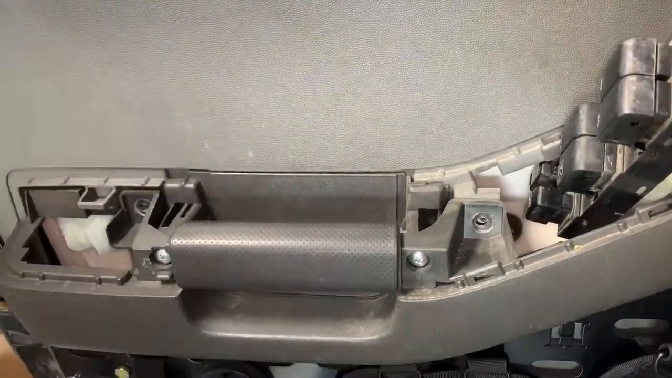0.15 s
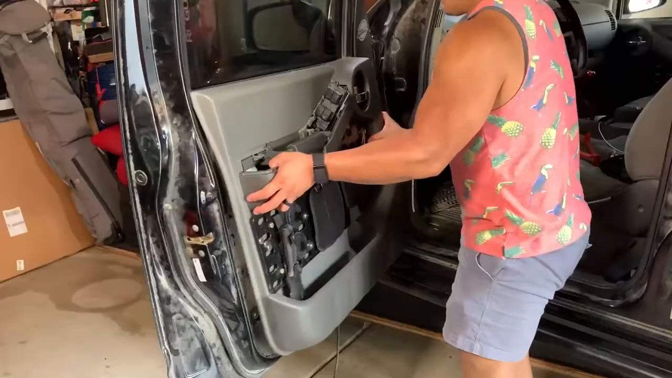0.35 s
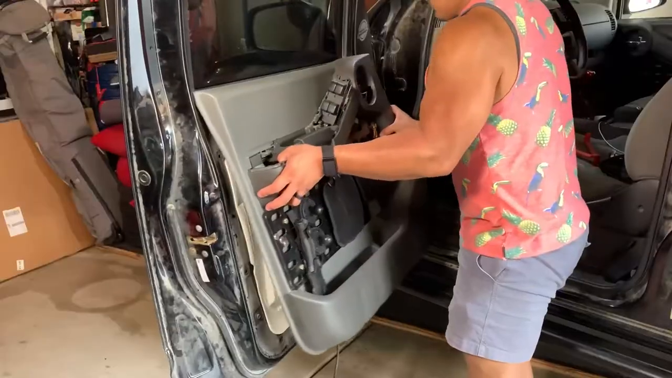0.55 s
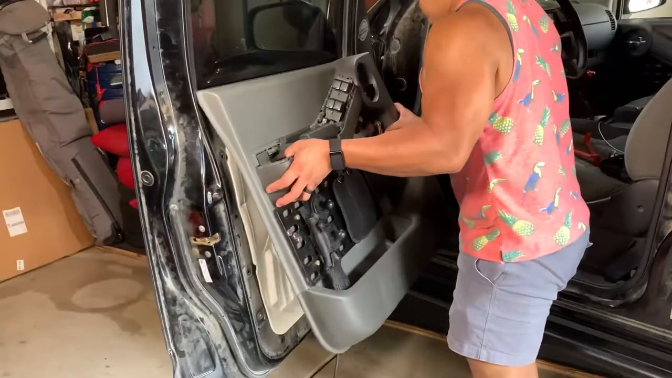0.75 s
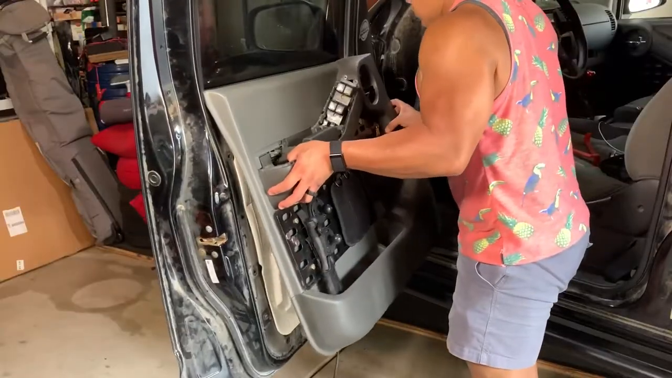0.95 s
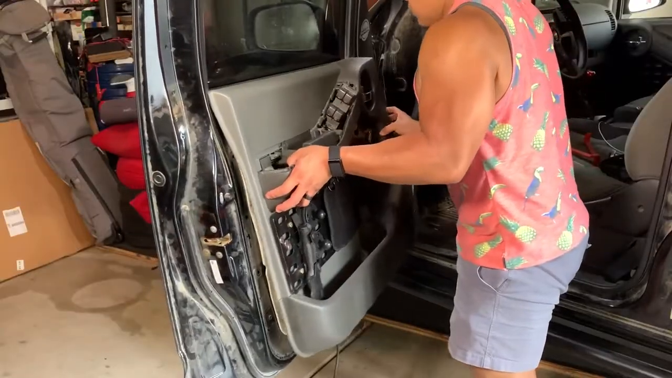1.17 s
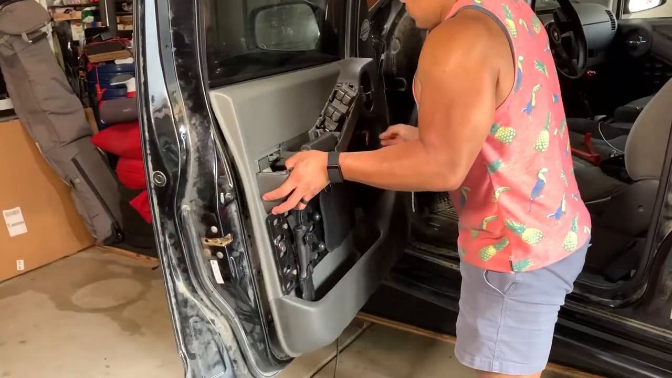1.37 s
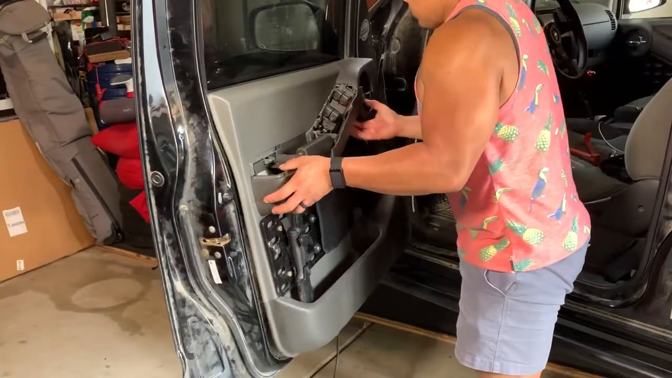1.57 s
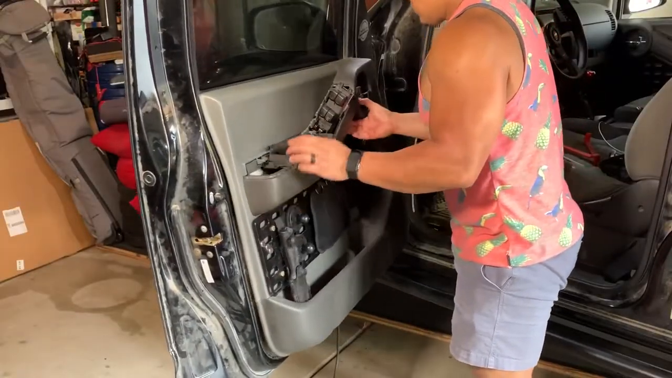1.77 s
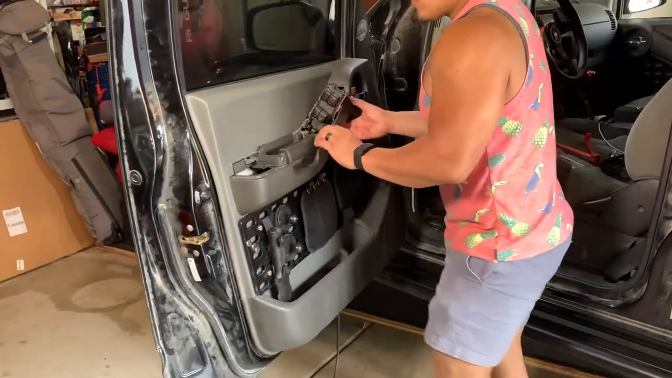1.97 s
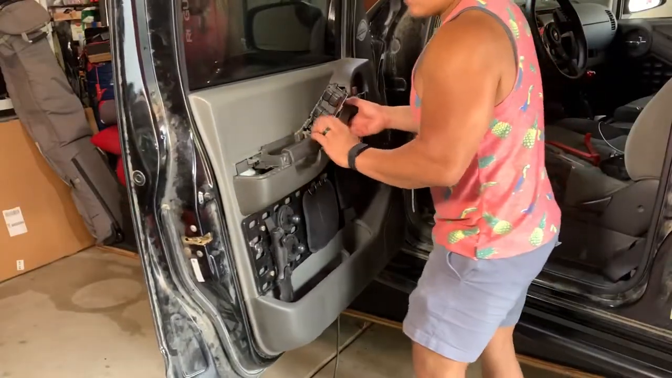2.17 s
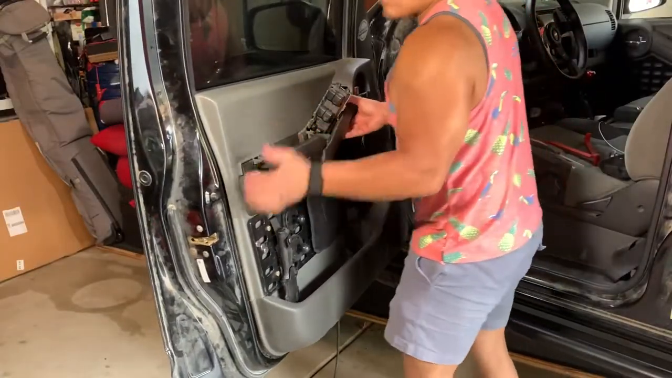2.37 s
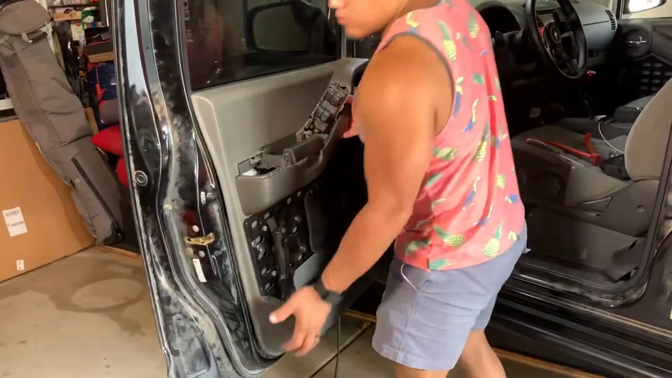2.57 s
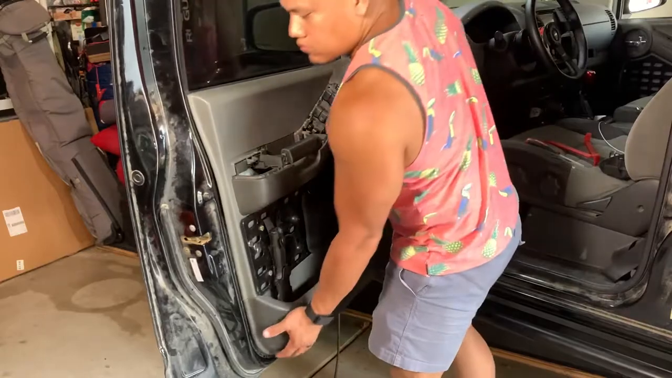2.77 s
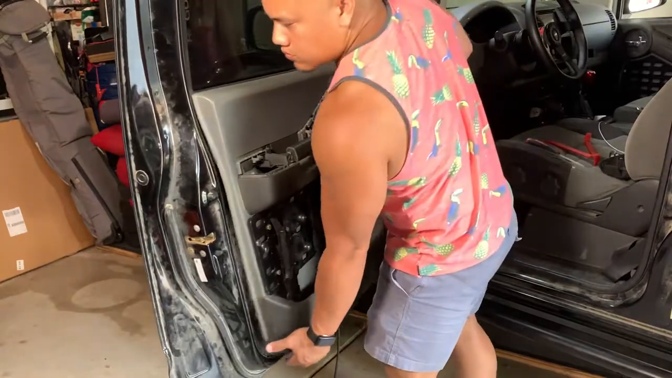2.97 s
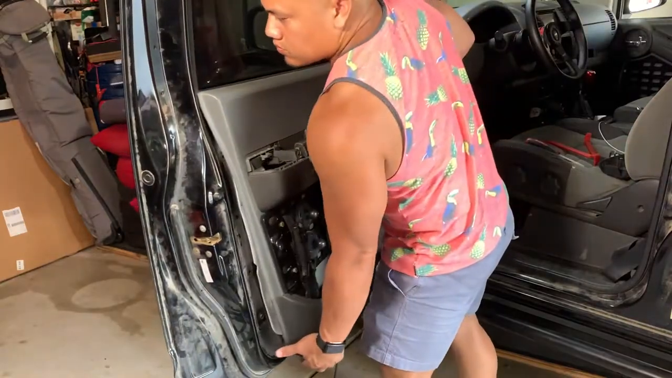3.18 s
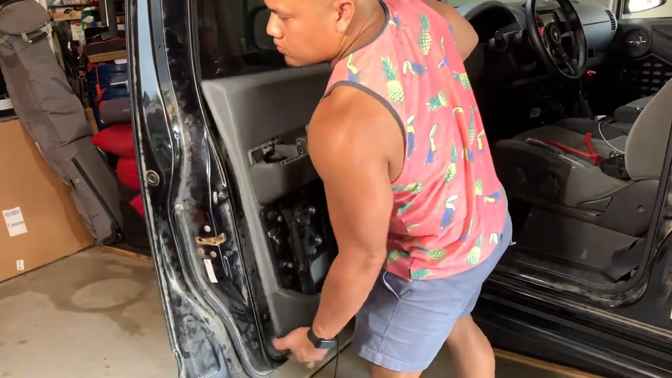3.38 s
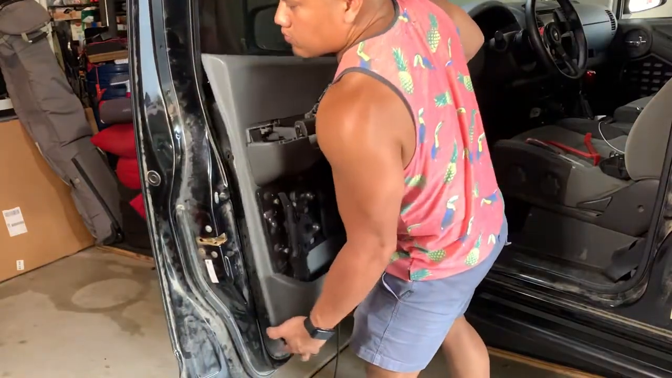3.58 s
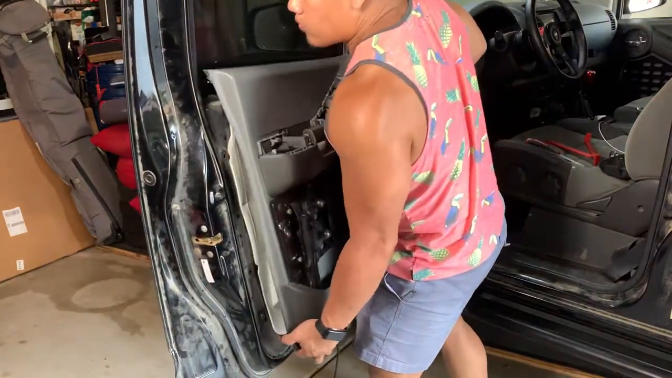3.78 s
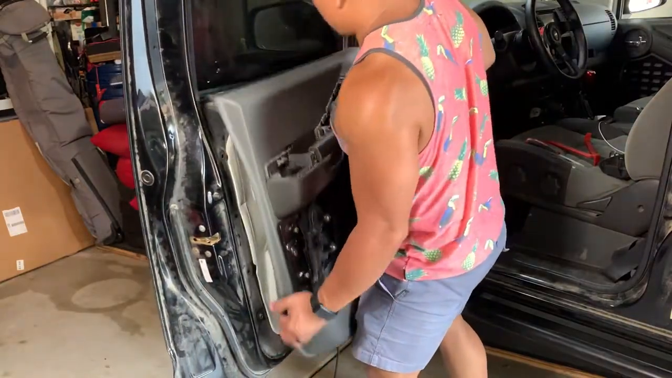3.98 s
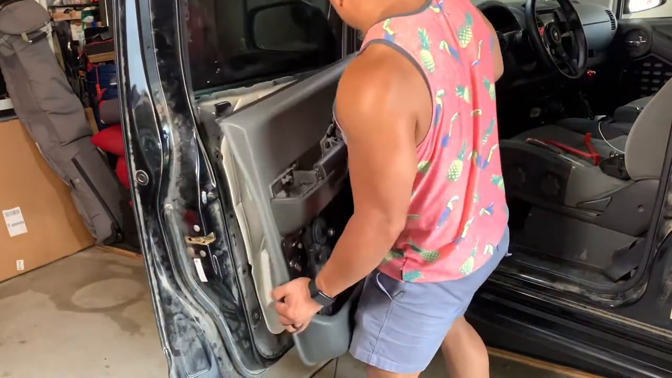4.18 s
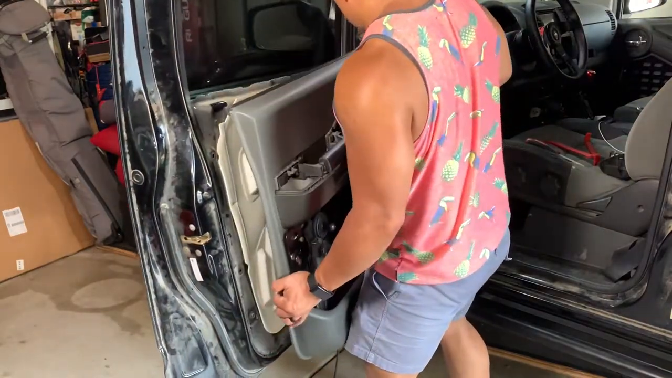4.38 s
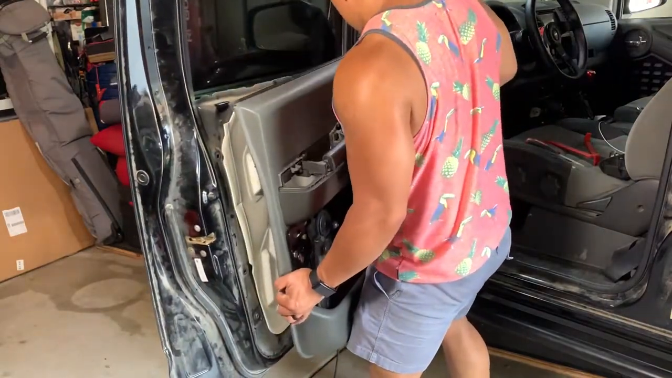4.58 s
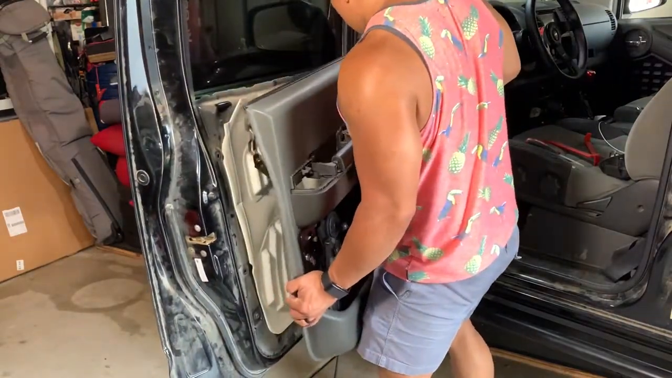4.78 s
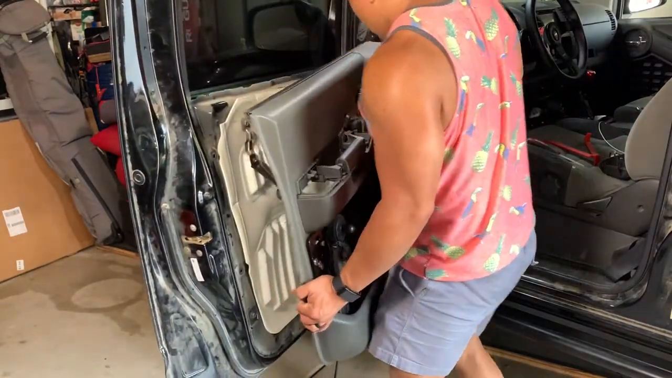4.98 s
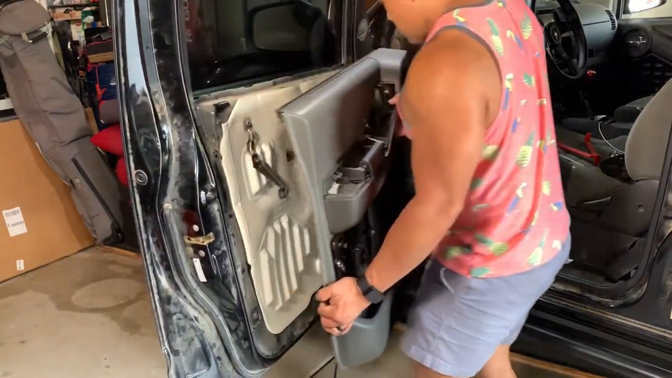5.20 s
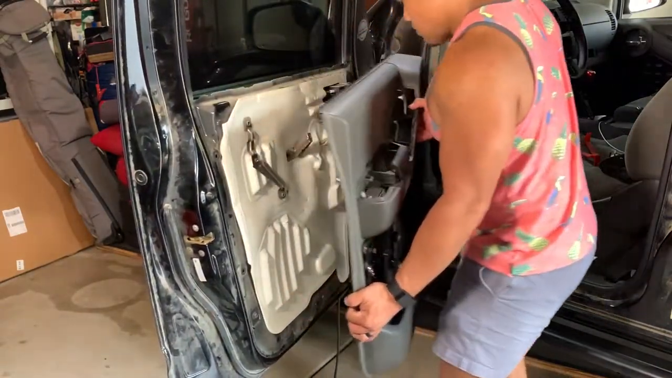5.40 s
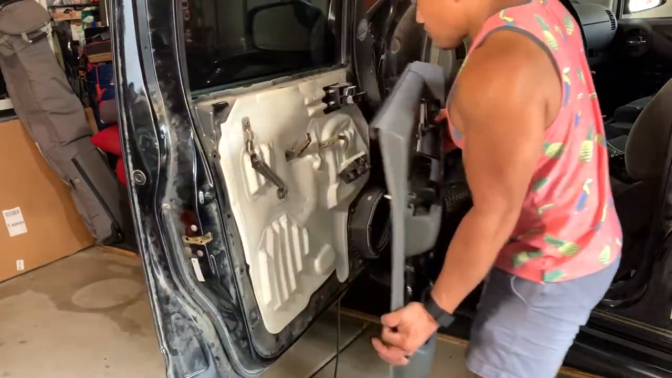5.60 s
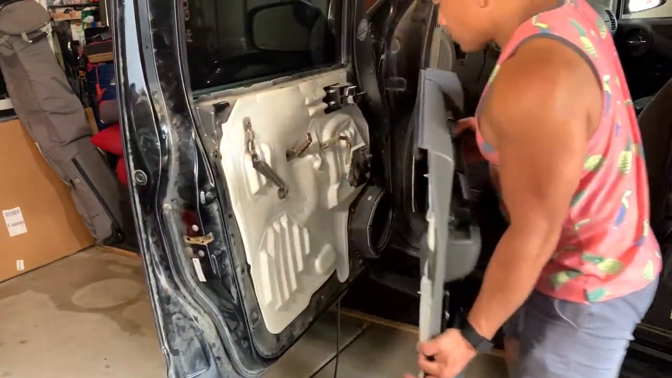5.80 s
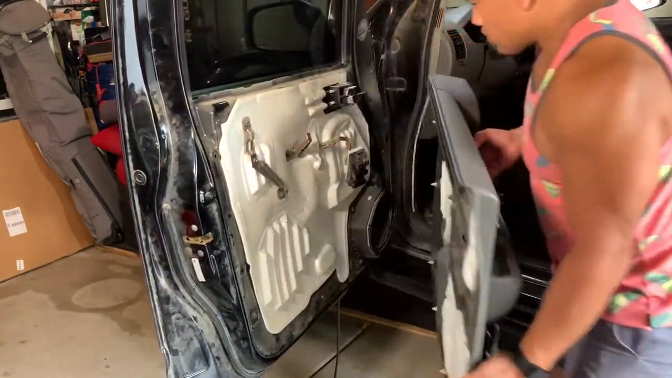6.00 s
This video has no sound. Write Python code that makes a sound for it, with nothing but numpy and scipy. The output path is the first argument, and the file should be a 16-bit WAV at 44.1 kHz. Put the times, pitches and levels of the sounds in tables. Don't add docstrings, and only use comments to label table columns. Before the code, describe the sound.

After a tiny silence, a plastic car door panel is tugged close to the microphone: a knock with crackle, soft bumps and rubbing, then sharp snaps around one and a half seconds. A quieter stretch holds light rubbing and faint squeaks. Near three and a half seconds come a chirp, booming thuds and the loudest crack, followed by scattered clicks and knocks that thin into faint rustles. Short garage echoes, low air hum.

```python
import sys
import numpy as np
from scipy import signal
from scipy.fft import rfft, irfft
from scipy.io import wavfile
from scipy.ndimage import uniform_filter1d

SR = 44100
rng = np.random.default_rng(int(sys.argv[2]) if len(sys.argv) > 2 else 0)


def voltage_ratio(level):
    return 10 ** (np.asarray(level, float) / 20)


def to_wav(sig):
    pcm = np.clip(np.atleast_2d(sig), -1, 1) * 32767
    pcm = np.round(pcm).astype(np.int16)
    wavfile.write(sys.argv[1], SR, pcm.T)


N = 266760

# frequency in Hz, level in dB.
HISS_COLOUR = [(2800, -5), (4500, -0.6), (7000, -1.5), (10000, -2), (12000, -10.5), (15500, -5),
               (16300, -26.5)]


def evened(x):
    return x / np.sqrt(np.mean(x ** 2) + 1e-20)


def read(points, hz):
    f, value = np.transpose(points)
    return np.interp(np.log(hz + 1), np.log(f + 1), value)


def add(mix, s, sound):
    part = mix[round(s * SR):][:len(sound)]
    part += sound[:len(part)]


def colour(x, points):
    hz = np.fft.rfftfreq(x.shape[-1], 1 / SR)
    return evened(irfft(rfft(x) * voltage_ratio(read(points, hz)), x.shape[-1]))


def resonances(x, modes):
    out = 0
    for k, (hz, width, db) in enumerate(modes):
        b, a = signal.iirpeak(hz, hz / width, SR)
        ringing = signal.lfilter(b, a, signal.lfilter(b, a, x))
        out = out + (-1) ** k * voltage_ratio(db) * evened(ringing)
    return evened(out)


def surge(t, s, rise_s, fall_s):
    return voltage_ratio(-20 * np.maximum((s - t) / rise_s, (t - s) / fall_s))


def air():
    # frequency in Hz, density in dB per Hz.
    hum_colour = [(30, 13), (60, -6), (120, -11.5), (250, -18), (600, -25.5), (1500, -31), (3000, -50),
                  (6000, -53.5), (16000, -61)]
    same, left, right = rng.standard_normal((3, N))
    bass = signal.lfilter(*signal.butter(1, 900, fs=SR), same)
    pair = np.array([left, right]) + 0.73 * bass
    tilt = [(hz, db - 10 * np.log10(1 + 5.6 / (1 + (hz / 900) ** 2))) for hz, db in hum_colour]
    return voltage_ratio(-41.5) * colour(pair, tilt)


def echoes():
    # frequency in Hz, t60 in seconds.
    decay = [(100, 0.24), (400, 0.28), (1500, 0.34), (4000, 0.24), (9000, 0.24), (15000, 0.24)]
    # frequency in Hz, level in dB.
    echo_colour = [(100, -4), (350, -3.5), (1000, -1.5), (3000, -0.5), (9000, -1.5), (15000, -12.5)]
    taps = np.zeros((2, SR // 2))
    at = np.arange(120, SR // 2 - 20, 20) + rng.integers(0, 20, (2, (SR // 2 - 121) // 20))
    np.put_along_axis(taps, at, rng.choice([-1., 1.], at.shape), 1)
    hz, t, z = signal.stft(taps, SR, nperseg=256)
    shared = .93 / (1 + (hz[:, None] / 560) ** 2)
    z = np.array([z[0], shared * z[0] + np.sqrt(1 - shared ** 2) * z[1]])
    fading = voltage_ratio(-60 * t / read(decay, hz)[:, None])
    tail = signal.istft(z * fading, SR, nperseg=256)[1]
    tail = tail / np.linalg.norm(tail[0])
    hz = np.fft.rfftfreq(tail.shape[1], 1 / SR)
    return irfft(rfft(tail) * voltage_ratio(read(echo_colour, hz)), tail.shape[1])


def garage(x):
    turn = 2 * np.pi * np.arange(N) / SR / .05
    first = signal.fftconvolve((x * np.cos(turn))[None], echoes(), axes=1)
    second = signal.fftconvolve((x * np.sin(turn))[None], echoes(), axes=1)
    return first[:, :N] + second[:, :N]


def door_boom():
    # frequency in Hz, width in Hz, level in dB.
    skin_modes = [(56.6, 39, -4.5), (93.6, 27.6, -2), (134.4, 54, -2.5)]
    # peak time in seconds, boom in dB, release in seconds per 20 dB.
    pushes = [(.25, -39, 0.12), (.45, -41, .1), (.6, -42.5, 0.21), (.89, -39.5, 0.11), (1.33, -42.5, 0.067),
              (1.52, -41.5, 0.19), (1.67, -37, .15), (2.13, -45.5, 0.089), (2.78, -49, .08),
              (2.909, -48.5, 0.13), (3.43, -36, .08), (3.51, -21.5, 0.033), (3.59, -34.5, 0.084),
              (3.87, -29.5, 0.08), (4.03, -27, 0.17), (4.34, -39, 0.084), (4.65, -43, .1), (4.8, -44, .15),
              (6.04, -57, .1)]
    t = np.arange(0, N + 64, 64) / SR
    boom = voltage_ratio(-52.5)
    for s, db, fall_s in pushes:
        boom = boom + voltage_ratio(db) * surge(t, s, 0.064, fall_s)
    boom = np.interp(np.arange(N) / SR, t, boom)
    return voltage_ratio(-0.5) * boom * resonances(rng.standard_normal(N), skin_modes)


def slips(per_s, spread_db, smooth):
    size = voltage_ratio(spread_db * np.minimum(rng.exponential(1, N), 4)) * rng.choice([-1., 1.], N)
    clicks = size * (rng.random(N) < per_s / SR)
    return evened(clicks) + smooth * rng.standard_normal(N)


def rubbing():
    # frequency in Hz, width in Hz, level in dB.
    body_modes = [(242, 110, 3), (310, 83, 6.5), (496.3, 39, 1), (620, 300, -2.5), (917, 160, -4)]
    # frequency in Hz, level in dB.
    scrape_colour = [(800, -18), (1400, -9), (2000, -1), (2800, -6.5), (4000, -7), (5500, -17),
                     (7000, -23.5)]
    # time in seconds, effort in dB.
    grip = [(0.21, -46), (0.4, -47.5), (0.8, -60.5), (1.2, -51), (1.43, -81), (1.6, -45), (1.9, -58),
            (2.4, -70), (2.7, -71), (2.9, -59.5), (3.3, -62.5), (3.7, -55), (4.2, -47), (4.5, -62.5),
            (4.9, -43), (5.14, -66.5), (5.6, -65), (6.05, -64.5)]
    # peak time in seconds, shudder, scrape and hiss in dB.
    jolts = [(.385, -44, -69, -76), (.78, -45, -60, -84), (.89, -47.5, -69, -82), (1.17, -49.5, -71, -67),
             (1.329, -45.5, -65, -86), (1.487, -33.5, -37.5, -61.5), (1.639, -34, -60, -46),
             (1.98, -56, -78, -90), (2.861, -47, -76, -65), (3.511, -29.5, -43, -75),
             (3.661, -38, -71, -72), (3.832, -38, -29.5, -65), (3.921, -29, -56, -47),
             (4.027, -16.5, -39, -51.5), (4.21, -37.5, -53, -61.5), (4.65, -41.5, -53, -70),
             (4.93, -47, -64, -53), (5.18, -39.5, -58, -77), (5.949, -55, -67, -79), (4.87, -38, -61, -70),
             (3.6, -41, -59, -76), (3.7, -50, -70, -78), (1.72, -47, -66, -75), (1.81, -47, -62, -75)]
    # start, end and rise in seconds, scrape and hiss in dB.
    strokes = [(0.786, 0.938, 0.053, -56, -45.5), (2.134, 2.332, 0.02, -47.5, -46.5),
               (2.7, 2.97, 0.035, -61, -58.5), (3.35, 3.54, 0.055, -43, -51.5),
               (4.92, 5.014, 0.021, -64, -49), (5.247, 5.53, 0.025, -62, -56.5),
               (5.63, 5.82, 0.077, -63.5, -56.5), (5.91, 6.0, 0.0077, -61, -57.5),
               (1.236, 1.308, .008, -55, -80), (1.99, 2.071, 0.014, -58.5, -66),
               (3.802, 3.86, 0.028, -34.5, -57.5), (0.41, 0.478, .0074, -53, -68),
               (4.22, 4.32, 0.031, -58, -44), (.212, 0.28, .004, -54, -56), (1.546, 1.622, 0.029, -48, -41),
               (5.5, 5.67, 0.027, -70, -74), (5.78, 5.92, .02, -78, -73), (3.22, 3.35, .02, -67, -69.5),
               (5.96, 6.08, 0.024, -71, -66.5), (1.142, 1.28, .04, -67.5, -68.5),
               (1.34, 1.43, .01, -65.5, -69.5), (5.82, 5.9, .008, -67, -67), (5.11, 5.2, 0.044, -53, -62),
               (3.0, 3.14, 0.032, -70.5, -74), (3.84, 3.99, .01, -41.5, -57.5),
               (1.6, 1.696, 0.0088, -49, -53), (4.82, 4.97, .01, -60, -53)]
    t = np.arange(0, N + 64, 64) / SR
    shudder = voltage_ratio(np.interp(t, *np.transpose(grip)))
    scrape, hiss = voltage_ratio(-12.5) * shudder, voltage_ratio(-28) * shudder
    for s, shudder_db, scrape_db, hiss_db in jolts:
        jolt = surge(t, s, 0.024, 0.048)
        shudder = shudder + voltage_ratio(shudder_db) * jolt
        scrape = scrape + voltage_ratio(scrape_db) * jolt
        hiss = hiss + voltage_ratio(hiss_db) * jolt
    for start, end, rise_s, scrape_db, hiss_db in strokes:
        stroke = np.clip(np.minimum((t - start) / rise_s, (end - t) / 0.045), 0, 1) ** 6.7
        scrape = scrape + voltage_ratio(scrape_db) * stroke
        hiss = hiss + voltage_ratio(hiss_db) * stroke
    shudder, scrape, hiss = (np.interp(np.arange(N) / SR, t, c) for c in (shudder, scrape, hiss))
    body = shudder * resonances(slips(150, 5.0, 0.94), body_modes)
    edges = scrape * colour(slips(1700, 1.3, 1.1), scrape_colour)
    return body + edges + hiss * colour(slips(2200, 1.4, 1.0), HISS_COLOUR)


def squeaks():
    # start in seconds, length in seconds, start Hz, end Hz, level in dB.
    whistles = [
        (2.495, .17, 2490, 2500, -76),
        (2.66, .11, 2520, 2540, -70),
        (2.54, .2, 3250, 3150, -83),
        (3.358, .04, 1800, 1550, -48),
        (3.364, .025, 1500, 500, -41),
        (2.5, .16, 2320, 2300, -80),
        (3.36, .035, 1500, 1450, -49),
    ]
    out = np.zeros(N)
    for s, length, from_hz, to_hz, db in whistles:
        t = np.arange(0, length, 1 / SR)
        waver = signal.lfilter(*signal.butter(2, 50, fs=SR), rng.standard_normal((2, len(t))))
        turns = np.cumsum(from_hz + (to_hz - from_hz) * t / length) / SR
        line = (1.5 + evened(waver[0]) + 1j * evened(waver[1])) * np.exp(2j * np.pi * turns)
        add(out, s, voltage_ratio(db) * line.real * np.sin(np.pi * t / length) ** 0.18)
    return out


def crackles():
    # start in seconds, peak in dB, centre in Hz.
    bursts = [(0.259, -23.5, 3500), (.2548, -36, 6540), (.4375, -49, 11000), (.841, -33, 6560),
              (.855, -35, 6300), (.862, -32, 10000), (1.4745, -26, 4500), (1.6102, -27, 3500),
              (1.656, -36, 4000), (1.7872, -32, 2000), (1.894, -46, 10000), (3.449, -28, 10200),
              (3.8235, -22, 5600)]
    out = np.zeros(N)
    t = np.arange(1500) / SR
    for s, db, hz in bursts:
        band = signal.butter(2, [hz * 0.75, hz * 1.25], "band", fs=SR)
        grit = signal.lfilter(*band, rng.standard_normal(len(t)))
        add(out, s, voltage_ratio(db - 60 * t / 0.014) * evened(grit))
    return out


def ticks():
    # start in seconds, peak in dB, t60 in seconds.
    edge_ticks = [(0.2574, -84, 0.018), (1.079, -52, 0.026), (1.353, -48, 0.017), (1.38, -57.5, .02),
                  (1.044, -52, .02), (1.4748, -14, 0.015), (1.6304, -25.5, 0.029), (1.7397, -32, 0.027),
                  (1.8727, -35, 0.02), (2.632, -55, 0.019), (2.6983, -56, 0.018), (3.5262, -31, 0.021),
                  (3.9946, -38, 0.018), (4.0222, -22, 0.024), (4.0822, -21.5, 0.082), (4.255, -26.5, 0.017),
                  (4.5983, -16, 0.0188), (4.7383, -19, 0.0067), (4.818, -27, 0.023), (5.15, -39, 0.022),
                  (5.178, -32, 0.014), (5.4074, -44, 0.032), (5.8214, -68, 0.016), (5.9198, -50, 0.024)]
    # frequency in Hz, level in dB.
    tick_colour = [(5000, -28.5), (8000, -5.5), (10500, 0.5), (12500, -6), (15500, -13), (16500, -33)]
    out = np.zeros(N)
    t = np.arange(2000) / SR
    for s, db, t60 in edge_ticks:
        fading = voltage_ratio(db - 2.5 - 60 * t / np.clip(t60, .004, .08))
        add(out, s, fading * colour(rng.standard_normal(len(t)), tick_colour))
    return out


def panel_modes():
    # start in seconds, frequency in Hz, level in dB, t60 in seconds.
    tones = [(0.256, 462, -19.5, 0.093), (0.263, 300, -35, 0.077), (0.624, 406, -27, 0.042),
             (0.863, 304, -22, 0.1), (1.146, 935, -32.5, 0.086), (1.481, 450, -22, 0.065),
             (1.483, 257, -31, 0.091), (1.607, 960, -17, 0.057), (2.872, 585, -28.5, 0.099),
             (2.895, 620, -26, 0.083), (3.363, 1710, -34, .04), (3.374, 1174, -38, 0.037),
             (3.430, 614, -13, 0.068), (3.435, 96.3, -23, 0.38), (3.468, 257, -19.5, 0.2),
             (3.473, 310, -26, 0.091), (3.822, 1560, -14.5, 0.15), (3.822, 1726, -10, 0.086),
             (3.824, 2220, -21, 0.17), (3.825, 400, -23, 0.18), (4.021, 413, -2.5, 0.03),
             (4.023, 550, -5.5, 0.033), (4.037, 310, -21.5, 0.12), (4.600, 329, -22, 0.082),
             (4.738, 1483, -21.5, 0.096), (4.824, 336, -16, 0.064), (5.154, 1264, -31, 0.034),
             (4.258, 548, -20, 0.07), (5.180, 456, -23.5, 0.082), (5.588, 200, -30, 0.069),
             (.255, 1210, -30, 0.068), (.256, 1470, -32, 0.049), (.262, 2410, -29, 0.082),
                 (.587, 2690, -41, 0.046), (0.747, 960, -38, 0.055), (0.748, 1505, -41, 0.06),
                 (.755, 300, -29, .1), (.806, 1290, -41, .06), (.862, 936, -25.5, 0.062),
                 (.863, 2090, -46, 0.031), (1.097, 1010, -41, .05), (1.475, 850, -25.5, 0.098),
                 (1.475, 1314, -30, 0.063), (1.474, 1745, -25.5, 0.063), (1.474, 2220, -27, .05),
                 (1.476, 3666, -40, 0.069), (1.476, 4360, -33, .1), (1.61, 1720, -29, 0.071),
                 (1.61, 2080, -24.5, 0.046), (1.611, 2990, -28.5, .05), (1.621, 300, -20.5, 0.13),
                 (1.655, 1500, -30.5, 0.044), (1.71, 200, -46, 0.11), (1.787, 2340, -45, 0.051),
                 (3.449, 2210, -29, .04), (3.595, 347, -29.5, 0.11), (3.625, 310, -29, 0.16),
                 (3.64, 422, -35, 0.11), (3.809, 2920, -39.5, .06), (3.824, 904, -21.5, 0.12),
                 (3.824, 1020, -23.5, .15), (3.823, 1236, -23.5, .12), (3.824, 3660, -31, 0.21),
                 (3.824, 4280, -32.5, .12), (3.995, 1682, -19.5, 0.09), (3.994, 2010, -21, 0.11),
                 (3.995, 2390, -20, 0.082), (4.085, 2070, -21, 0.045), (4.085, 1510, -25.5, 0.039),
                 (4.092, 501, -21, 0.084), (4.74, 560, -23, 0.067), (4.739, 2350, -20, 0.053),
                 (4.742, 3100, -32, .05), (4.836, 400, -20.5, 0.065), (4.885, 1334, -33, 0.058),
                 (4.884, 2320, -35, .05), (5.07, 1250, -44, 0.046), (5.18, 1580, -33, 0.055),
                 (5.18, 1870, -38, 0.074), (5.033, 960, -46, .05), (5.926, 4550, -49, .06),
             (3.42, 300, -21, 0.16), (3.49, 260, -22, 0.083), (3.52, 320, -25, .12),
               (4.0, 300, -20, 0.12), (4.05, 500, -24, .1), (4.82, 560, -24, .07), (4.86, 330, -31, .1),
               (4.905, 350, -29.5, .12), (4.605, 480, -28, 0.064), (2.875, 800, -38, .07),
               (2.897, 950, -33, 0.068), (2.9, 440, -38, .07), (.628, 660, -38, .05),
               (1.147, 700, -38, .06), (1.25, 440, -37, .07), (1.319, 1200, -41, .04),
               (1.61, 1130, -26, .05), (1.48, 820, -31, 0.062), (3.372, 900, -37.5, .03),
               (3.378, 650, -39, .04), (4.742, 1700, -24, 0.064), (1.3, 1400, -43, .05),
               (3.545, 205, -28.5, .15), (3.823, 200, -22, .13), (3.615, 520, -34.5, .12),
               (1.69, 105, -33, .15)]
    out = np.zeros(N)
    t = np.arange(8000) / SR
    for s, hz, db, t60 in tones:
        turns = hz * t * (1 - 0.26 * t)
        rise = (1 - np.exp(-t * hz / 0.65)) ** 2
        add(out, s, voltage_ratio(db - 60 * t / t60) * rise * np.sin(2 * np.pi * turns))
    return out


def knock(body_db, snap_db, tick_db, contact_s):
    level_hz = [120, 380, 950, 2100, 4200]
    # frequency in Hz, factor on the ring time.
    damping = [(150, 1.39), (400, 0.57), (1000, 0.83), (2500, 0.53), (5000, 0.14)]
    place, luck, phase, late = rng.random((4, 100, 1)).astype(np.float32)
    grit = rng.random(3600).astype(np.float32)
    t = np.arange(3600, dtype=np.float32) / SR
    middle_db = 1.5 + 0.69 * body_db + 0.31 * snap_db
    ring_s = 0.074 * voltage_ratio(0.0443 * (body_db + 33.5))

    hz = (150 * 36 ** ((np.arange(100)[:, None] + place) / 100) ** .7).astype(np.float32)
    levels = [body_db - 8.0, body_db, middle_db - 6.5, snap_db - 2.0, (snap_db + tick_db) / 2]
    db = read(np.transpose([level_hz, levels]), hz) - 8.74 * luck
    t60 = np.clip(ring_s, .02, .3) * read(damping, hz)
    age = np.maximum(t - 2.52 * contact_s * late ** 2, 0)
    rise = 1 - np.exp(-hz * age / 0.87)
    modes = voltage_ratio(db - 60 * age / t60) * rise * np.sin(2 * np.pi * (hz * t + phase))

    crack = colour(grit - .5, HISS_COLOUR)
    crack = crack * (voltage_ratio(-60 * t / 0.017) + 0.34 * voltage_ratio(-60 * t / (0.78 * ring_s)))
    crack = crack * (1 - np.exp(-t / (0.058 * contact_s)))
    rattle = 1 + 1.3 * evened(uniform_filter1d(grit[::-1] - .5, size=60))
    ringing = modes[:30].sum(0) + voltage_ratio(-4.0) * rattle * modes[30:].sum(0)
    blow = voltage_ratio(-0.5) * ringing + voltage_ratio(tick_db + 11.0) * crack
    return blow * np.cos(np.pi / 2 * t / t[-1])


def blows():
    # start in seconds, panel body, fastener snap and edge tick in dB. First come further
    further_knocks = [(.561, -42.5, -50.5, -69), (.709, -59, -69, -85), (.846, -42, -47, -62),
                      (1.466, -46, -45, -54), (1.595, -38, -39, -49), (1.655, -35, -42, -52),
                      (1.698, -48, -52, -62), (1.905, -42.5, -54, -71), (3.395, -35, -63, -66),
                      (3.813, -40, -37, -55), (4.189, -41.5, -47, -59), (4.227, -31.5, -40.5, -66),
                      (4.884, -40.5, -48, -62), (4.924, -38, -49.5, -60), (5.131, -44, -52, -79),
                      (1.319, -45, -48, -79), (1.787, -42.5, -38.5, -64), (4.019, -30, -30, -42),
                      (4.817, -37.5, -36, -44), (.862, -38, -38, -63), (3.434, -26, -34, -53),
                      (5.179, -38.5, -45, -49.5)]
    bumps = [(.38, -34, -70, -76), (.419, -31.5, -44.5, -57.5), (.485, -44, -50, -87),
             (.586, -39.5, -43.5, -64), (.595, -47, -55, -74), (.623, -33.5, -63, -73),
             (.804, -33.5, -46.5, -70), (.86, -28, -37, -68), (.963, -38, -64, -78),
             (1.046, -42.5, -57, -67), (1.142, -34, -47.5, -93), (1.248, -35, -57, -77),
             (1.316, -45, -59, -80), (1.654, -34, -43, -67), (1.9, -41.5, -50, -68),
             (2.096, -46, -72, -81.5), (2.757, -43.5, -49.5, -62), (2.871, -37, -55, -62),
             (2.895, -35.5, -49.5, -56), (3.045, -48, -58, -76)]
    lifts = [(3.363, -35.5, -43, -59), (3.418, -20.5, -27, -49), (3.467, -18, -32.5, -40),
             (3.489, -22.5, -37, -45), (3.56, -34, -45.5, -56), (3.621, -46, -53, -69),
             (4.017, -22.5, -30, -36.5), (4.203, -34.5, -35.5, -80), (4.253, -26, -35.5, -36),
             (4.881, -31, -44.5, -49), (5.031, -54, -49, -96), (5.11, -45, -54, -75),
             (5.586, -48.5, -63, -67.5), (5.923, -47, -44, -57.5)]
    snaps = [(.212, -36, -39, -72), (.255, -23, -30.5, -42.5), (.745, -35, -46.5, -62),
             (1.096, -39, -52, -67), (1.474, -20, -32.5, -32), (1.608, -26, -29.5, -40.5),
             (1.745, -33.5, -73, -51), (1.787, -35.5, -49, -59), (1.874, -49, -52, -54.5),
             (2.534, -71, -55.5, -73), (2.631, -70, -77, -81), (2.697, -51.5, -62, -72),
             (3.418, -26.5, -38, -66), (3.449, -19.5, -32, -46), (3.526, -34, -46, -47),
             (3.822, -14, -10.5, -25.5), (3.993, -25, -23, -39), (4.084, -28.5, -28.5, -32.5),
             (4.598, -29.5, -39, -47), (4.738, -23, -24, -28.5), (4.817, -25.5, -36.5, -41),
             (5.154, -42.5, -46, -54), (5.178, -32, -43.5, -42), (5.408, -69, -53, -59),
             (5.489, -60, -58, -60.5), (5.605, -67, -70, -61), (5.823, -61, -46, -62)]
    out = np.zeros(N)
    for hits, contact_s in ((further_knocks, .0023), (bumps, .006), (lifts, .006), (snaps, .0015)):
        for s, body_db, snap_db, tick_db in hits:
            add(out, s, knock(body_db, snap_db, tick_db, contact_s))
    return out


def scene():
    friction = door_boom() + rubbing()
    panel = friction + squeaks() + crackles() + ticks() + blows()
    modes = panel_modes()
    fine = signal.lfilter(*signal.butter(2, 1000, "high", fs=SR), friction)
    left = panel + modes
    right = np.roll(left - fine, 4) + np.roll(fine, 300)
    echoed = garage(panel + voltage_ratio(-5.5) * modes)
    return voltage_ratio(-3.0) * np.array([left, right]) + voltage_ratio(-3.0) * echoed + air()


def top_cut(x):
    return signal.sosfilt(signal.butter(12, 16650, fs=SR, output="sos"), x)


def record(dry):
    start_s, split_hz = .2121, 6300
    hz, z = np.fft.rfftfreq(N, 1 / SR), rfft(dry)
    high = .97 / (1 + (split_hz / (hz + 1)) ** 22)
    turned = z[0] * np.exp(2j * np.pi * (hz - 6125) / 4850)
    right = np.sqrt(1 - high ** 2) * z[1] * voltage_ratio(0.88) + high * turned
    edges = 1 / (1 + (44 / (hz + 1)) ** 6) / (1 + (hz / 15900) ** 140)
    x = irfft(np.array([z[0], right]) * edges, N)
    x = x * np.clip((np.arange(N) - start_s * SR) / 20, 0, 1)
    return top_cut(x)


dry = scene()
out = record(dry)
to_wav(out)
```